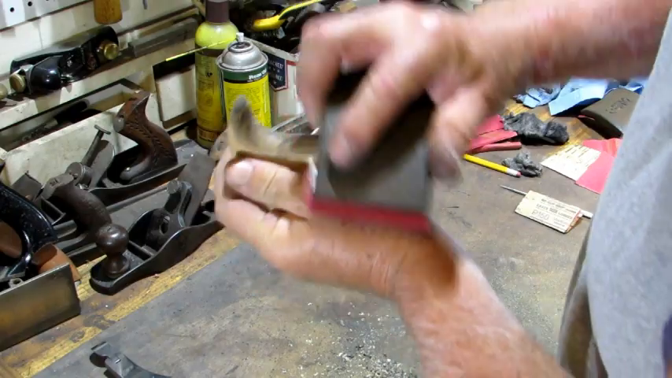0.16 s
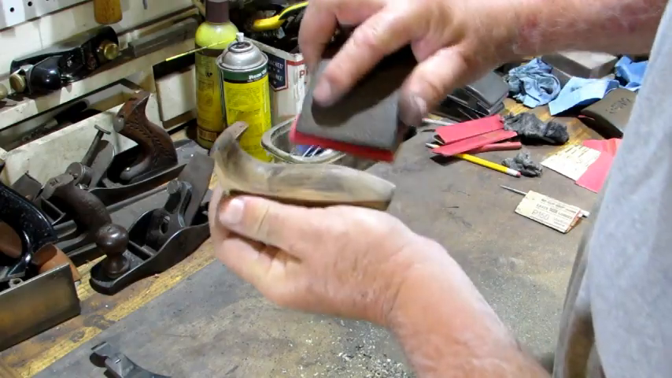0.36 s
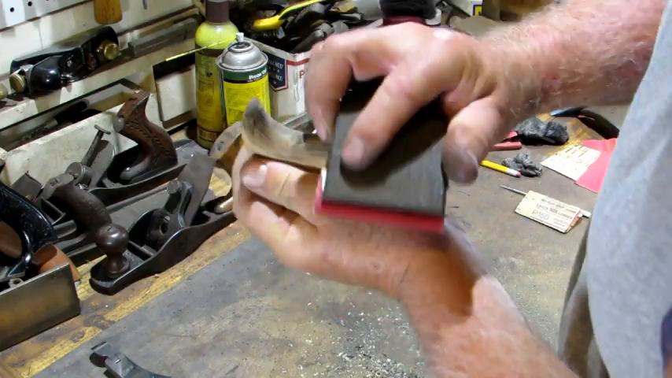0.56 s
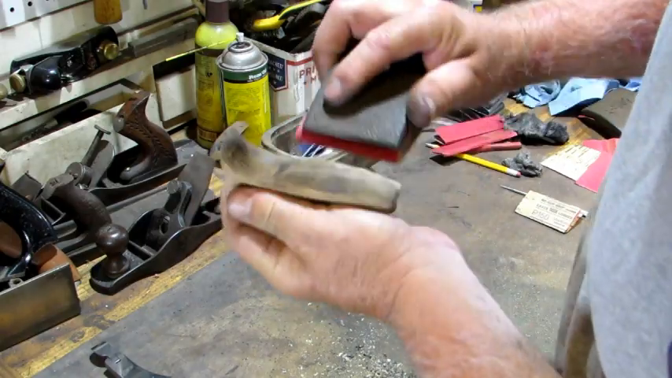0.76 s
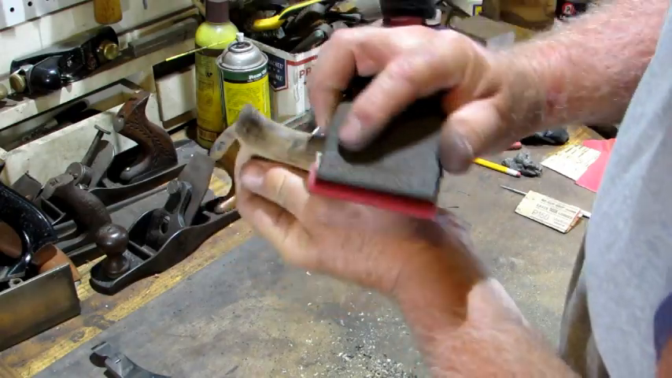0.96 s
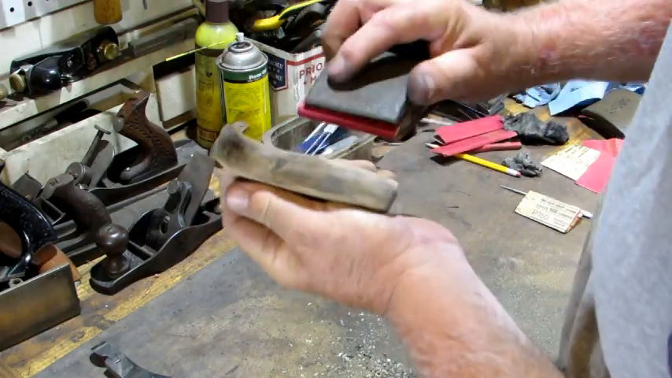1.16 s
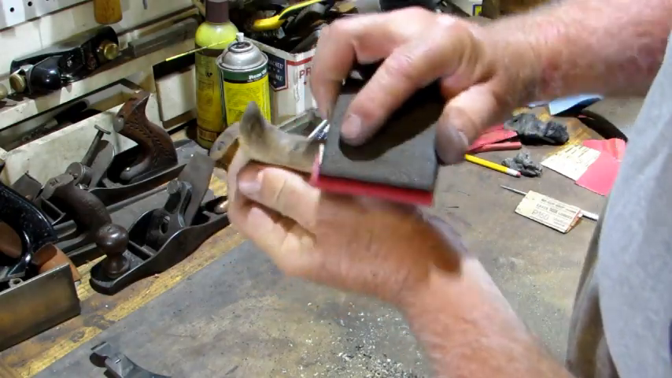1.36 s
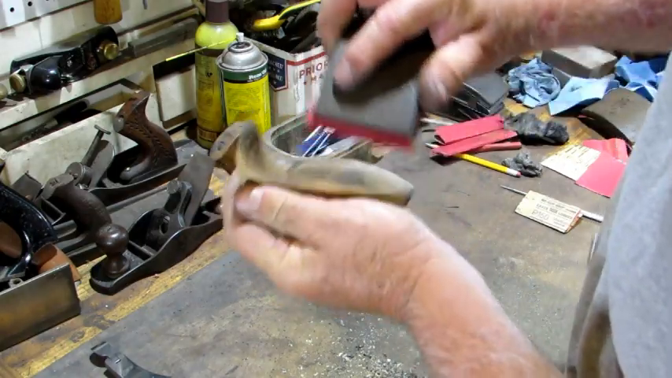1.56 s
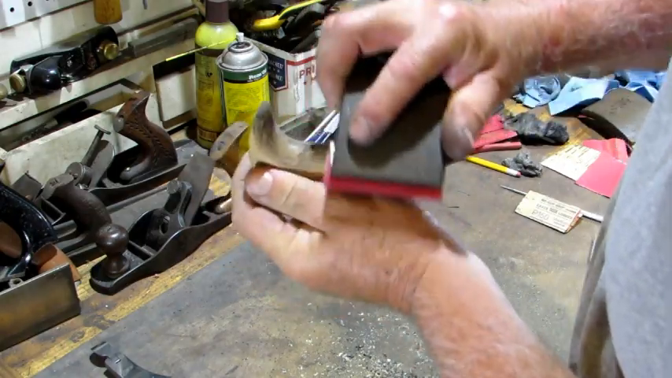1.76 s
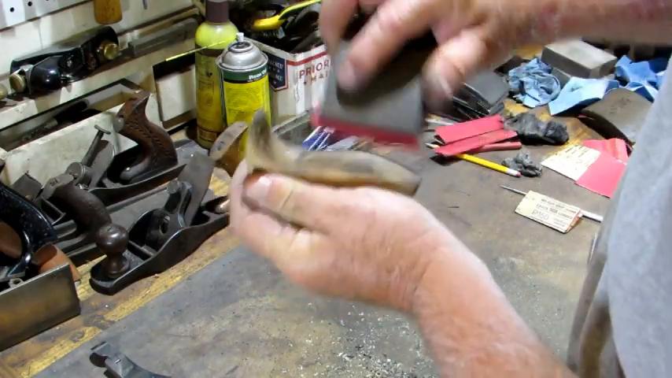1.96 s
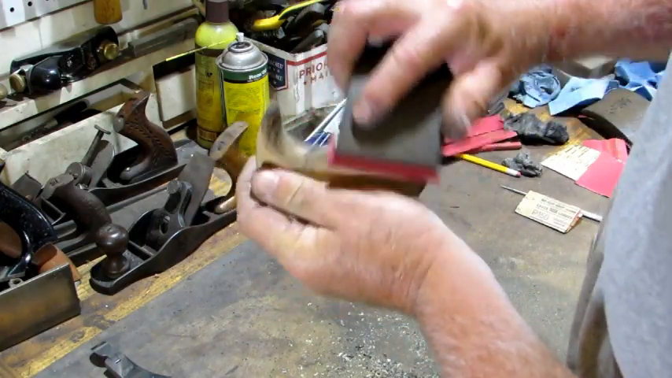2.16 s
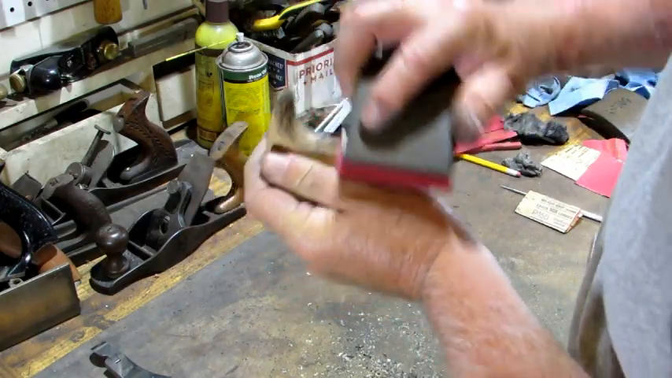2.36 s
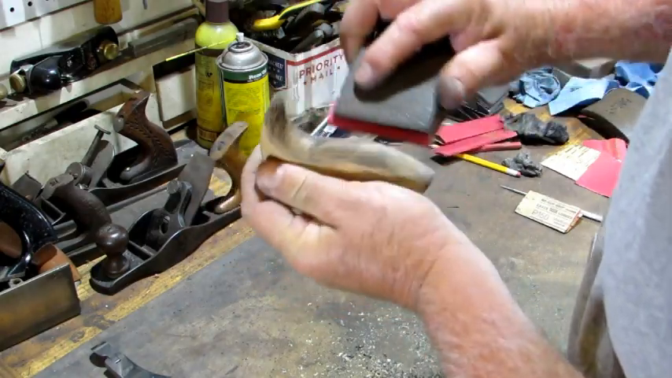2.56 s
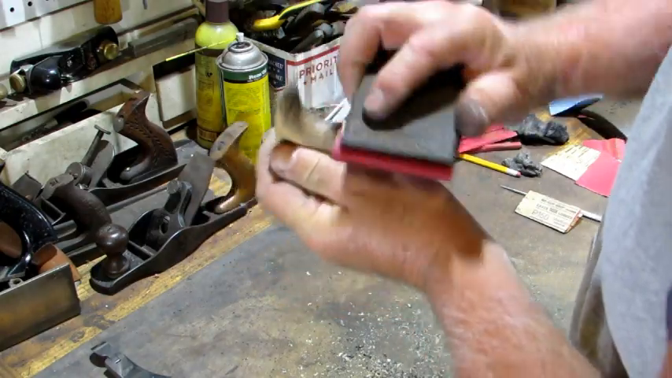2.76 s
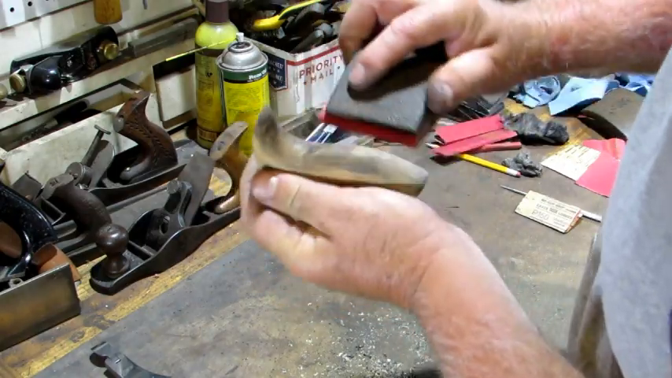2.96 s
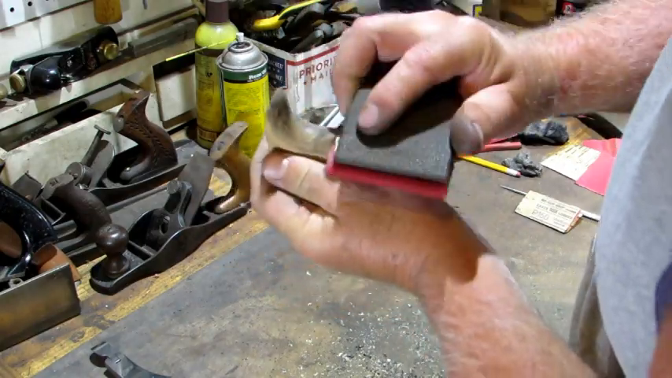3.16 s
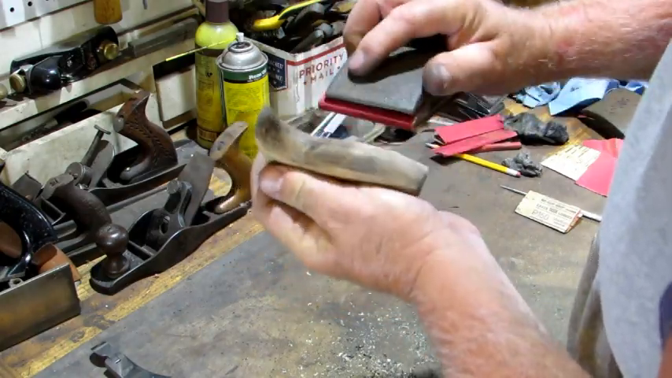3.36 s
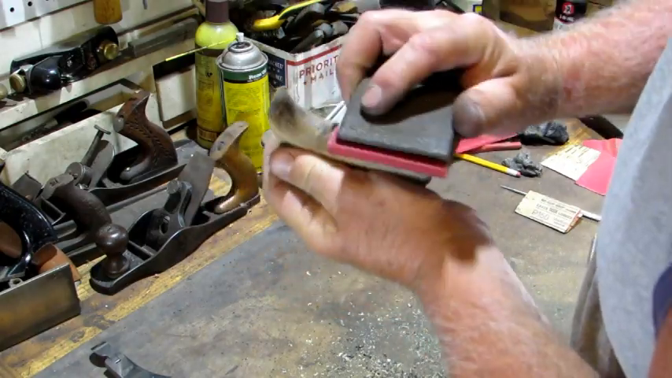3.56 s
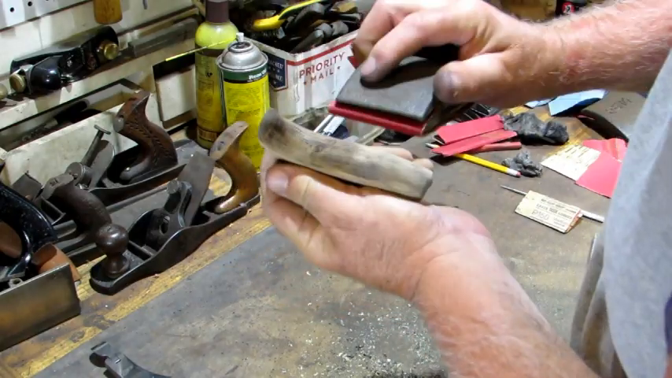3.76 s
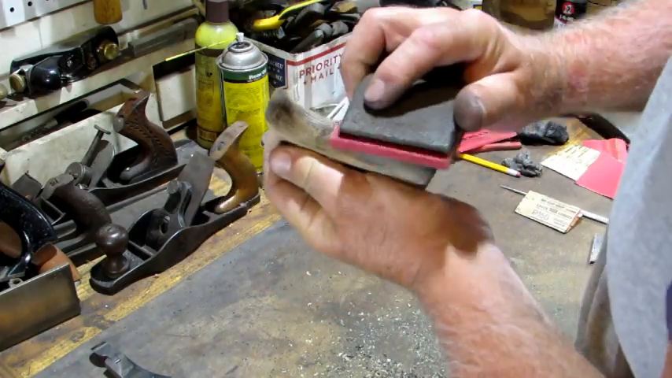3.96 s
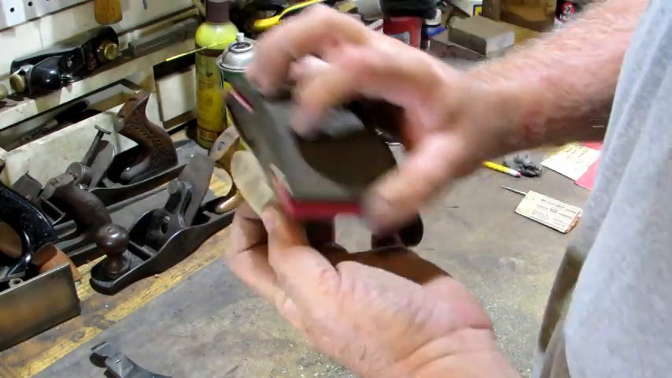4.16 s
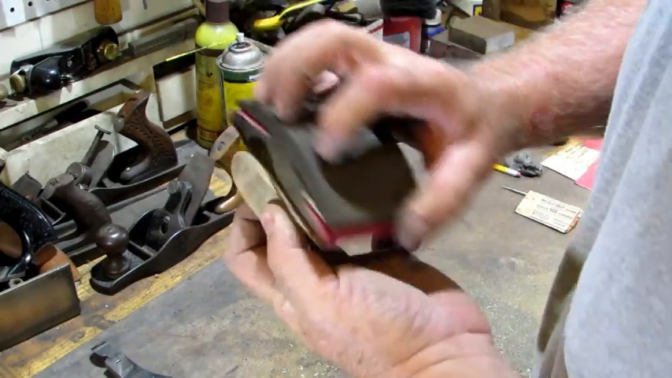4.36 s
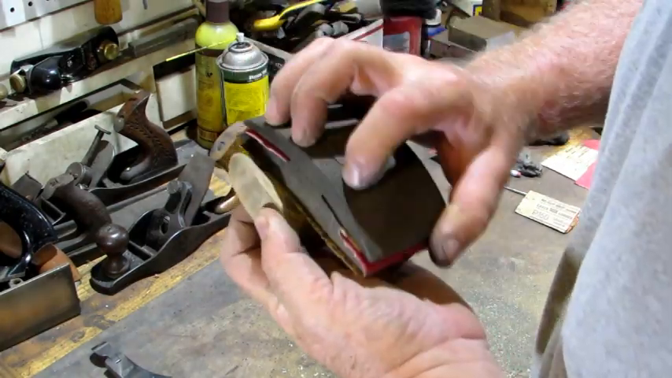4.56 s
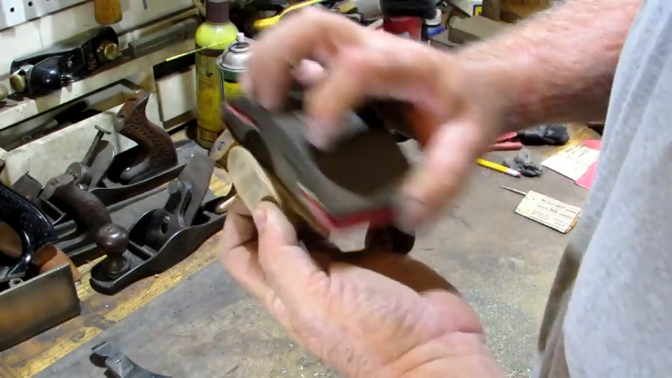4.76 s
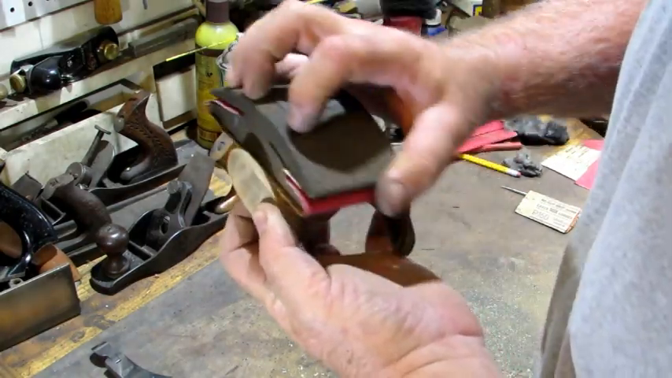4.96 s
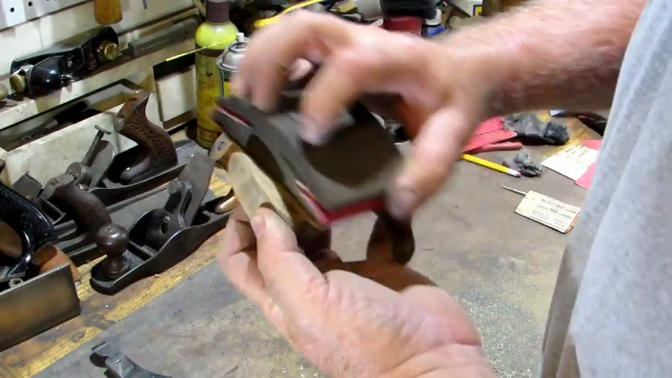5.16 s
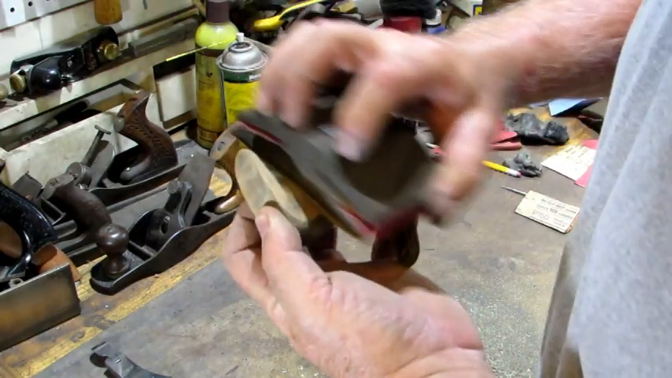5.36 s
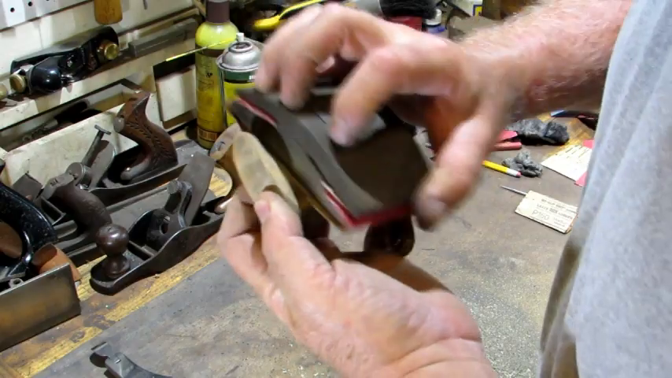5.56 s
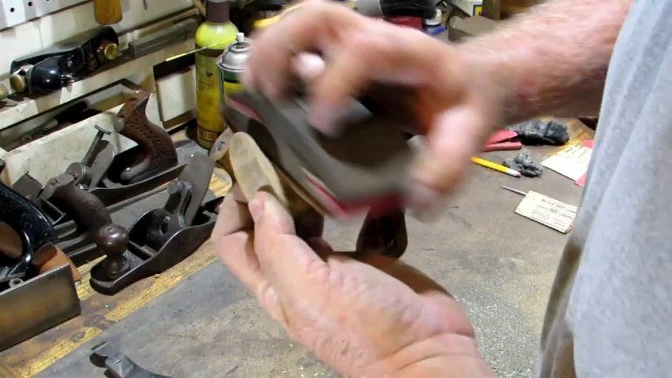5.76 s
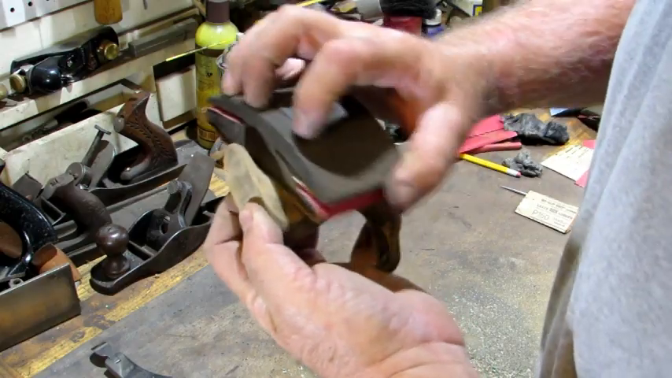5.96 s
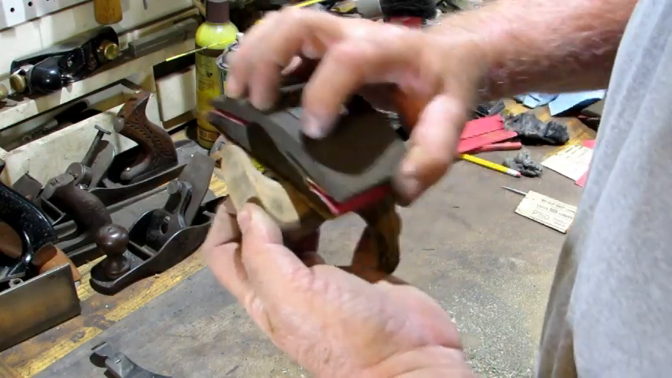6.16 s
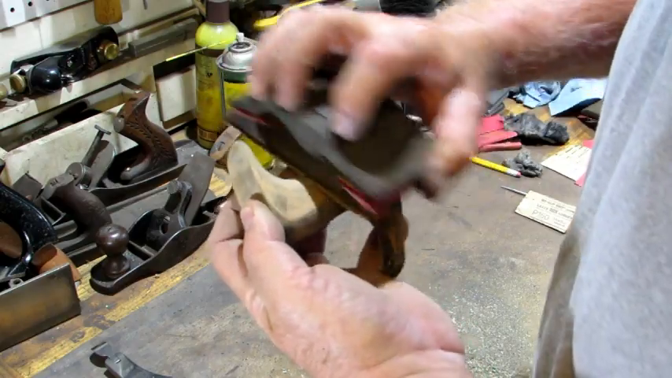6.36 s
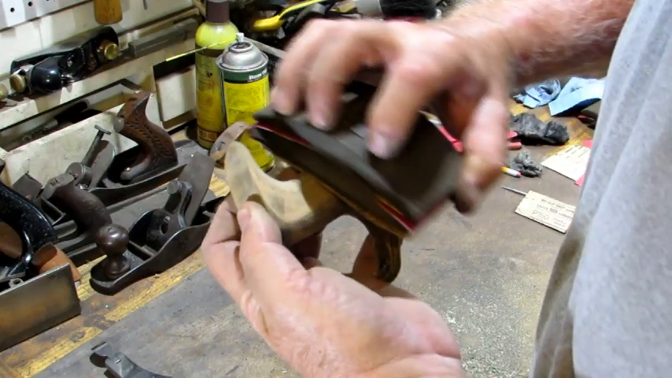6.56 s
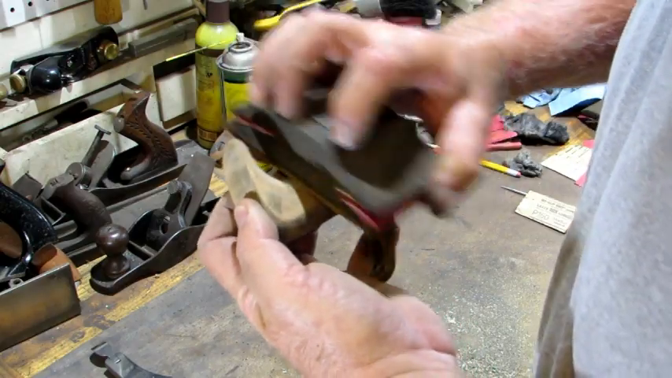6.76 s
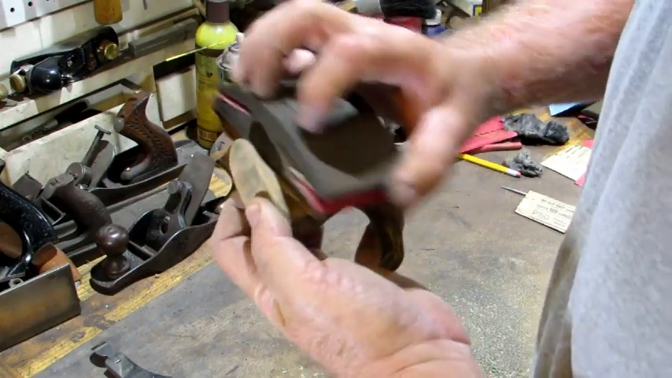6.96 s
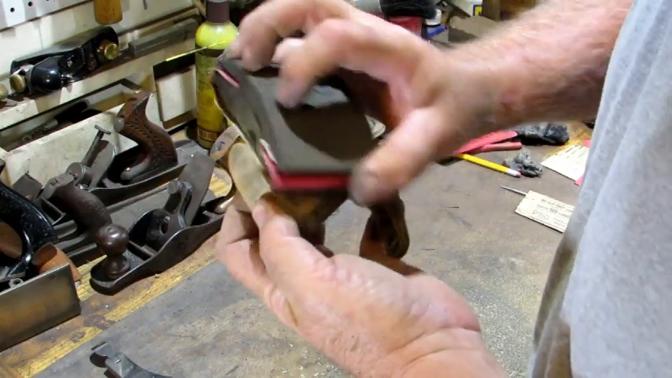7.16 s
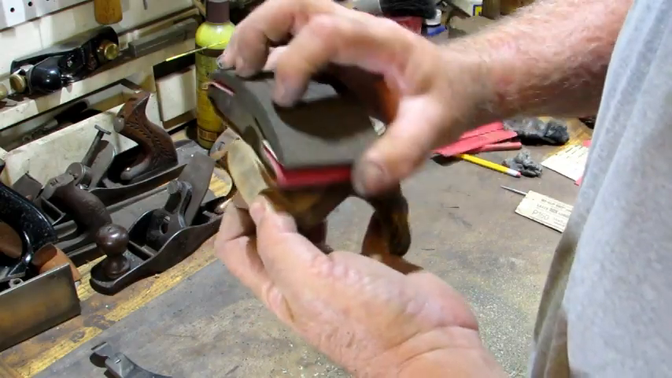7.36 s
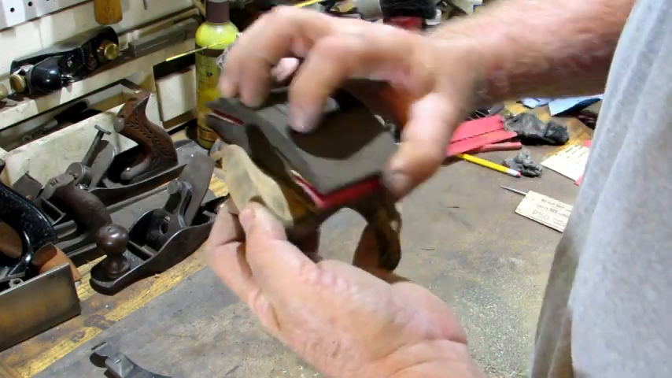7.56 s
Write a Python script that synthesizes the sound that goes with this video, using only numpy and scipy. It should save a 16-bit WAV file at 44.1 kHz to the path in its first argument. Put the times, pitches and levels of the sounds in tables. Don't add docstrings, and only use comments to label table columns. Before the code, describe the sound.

Close to the hands in a small workshop, a sandpaper block lands on a piece of hardwood with a knock, rasps away and back, then lifts, nearly three times a second. Halfway through, the scene cuts abruptly to quick continuous scrubbing, with hollow woody tones under bright grit hiss. A fan hums steadily behind, and the bench and walls answer briefly.

```python
import sys
import numpy as np
from scipy import signal
from scipy.fft import rfft, irfft, next_fast_len
from scipy.io import wavfile
from scipy.ndimage import uniform_filter1d, map_coordinates

SR = 44100
rng = np.random.default_rng(int(sys.argv[2]) if len(sys.argv) > 2 else 0)


def dump_mix(stems):
    frames = np.atleast_2d(stems).T
    limited = np.clip(frames, -1, 1)
    pcm = np.round(limited * 32767).astype(np.int16)
    wavfile.write(sys.argv[1], SR, pcm)


def gain_from_db(level_db):
    decades = np.asarray(level_db, float) / 20
    return 10 ** decades


N = 336483
LEAD = SR // 4
M = N + LEAD
CHANGE_S = 4.0293
CUT = LEAD + round(CHANGE_S * SR)

# [low body modes/dB, high body modes/dB, top upper modes/dB]
LEAN = [
    (0.5, -3.5, -5),
    (-2.5, 0, 5.5),
    (3.5, -2, -4),
    (3.5, -1.5, .3),
]


def unit(x):
    return x / np.sqrt(np.mean(x ** 2) + 1e-20)


def along(points, hz):
    f, v = np.transpose(points)
    return np.interp(np.log(hz + 1), np.log(f + 1), v)


def wobble(rate):
    step = np.arange(0, M + 32, 32)
    knots = rng.standard_normal(int(M * rate / SR) + 5)
    return np.interp(np.arange(M), step, map_coordinates(knots, [step * rate / SR]))


def filtered(x, response):
    m = next_fast_len(x.shape[-1] + 8192)
    return irfft(rfft(x, m) * response(np.fft.rfftfreq(m, 1 / SR)), m)[..., :x.shape[-1]]


def spread(pair, alike):
    turn = lambda hz: np.arccos(np.clip(along(alike, hz), -1, 1)) / 2
    mid, side = filtered(pair, lambda hz: np.array([np.cos(turn(hz)), np.sin(turn(hz))]))
    return np.array([mid + side, mid - side])


def add(track, start, part):
    stop = min(start + part.shape[-1], CUT if start < CUT else M)
    track[..., start:stop] += part[..., :stop - start]


def fan():
    # [f/Hz, level/dB per Hz]
    air_levels = [(20, -33), (45, -28), (100, -25), (135, -31.5), (190, -19.5), (220, -19), (250, -12),
                  (310, -14.5), (400, -17.5), (520, -19), (610, -22), (850, -17.5), (1500, -24.5),
                  (3500, -32), (12000, -60)]
    # [f/Hz, level/dB]
    hums = [(88, -63.5), (106, -57.5), (160, -63), (230, -46.5), (248, -43.5), (283, -47.5), (300, -46),
            (390, -51), (496, -49), (530, -47), (654, -49.5), (878, -51.5), (1099, -53.5)]
    # [f/Hz, likeness/0-1]
    air_alike = [(30, 0.17), (70, 0.033), (150, 0.16), (300, 0.91), (600, 0.54), (1200, 0.77), (4000, 0.82)]
    blade_hz, blade_db = 336.2, -35
    t = np.arange(M) / SR
    noise = filtered(rng.standard_normal((2, M)), lambda hz: gain_from_db(along(air_levels, hz)))
    air = gain_from_db(-34.5 + 0.47 * wobble(3.16)) * unit(noise)
    wander = 0.63 * np.cumsum(wobble(9)) / SR
    air[0] += gain_from_db(blade_db + 3 + 0.18 * wobble(21)) * np.sin(2 * np.pi * (blade_hz * t + wander))
    for hz, db in hums:
        wander = 2.8 * np.cumsum(wobble(9)) / SR
        swell_db = 2.5 * wobble(8)
        air[0] += gain_from_db(db + swell_db) * np.sin(2 * np.pi * (hz * t + wander))
    balance = gain_from_db([[-.6], [.6]])
    return (spread(air, air_alike) * balance)[:, LEAD:]


def shop(x, wet_db, bench_db, alike):
    # [f/Hz, t60/s]
    room_t60 = [(500, 0.68), (2500, 0.58), (6000, 0.57), (12000, 0.31)]
    out = x.copy()
    edges = np.r_[np.arange(CUT, 0, -SR // 4)[::-1], np.arange(CUT, M, SR // 4)[1:], M]
    for at, end in zip(np.r_[0, edges[:-1]], edges):
        noise = rng.standard_normal((3, int(.4 * SR)))
        hz, t, z = signal.stft(noise[:2] + alike * noise[2], SR, nperseg=256)
        room = gain_from_db(-60 * t / along(room_t60, hz)[:, None])
        bench = gain_from_db(bench_db - 60 * t / 0.023)
        tail = signal.istft(z * (room + bench), SR, nperseg=256)[1]
        wet = signal.fftconvolve(x[:, at:end], tail / np.linalg.norm(tail[0]), axes=1)
        add(out, at + 200, gain_from_db(wet_db) * wet)
    return out


def landings():
    # [t/s, peak level/dB, ring after the slap/dB]
    slaps = [(0.1504, -8, -6), (0.517, -19, 0), (0.894, -18, -1), (0.898, -24, -8), (1.245, -13.5, -5),
             (1.621, -31, -6), (1.994, -27, -3), (2.376, -20, -2), (2.746, -12, 4.5), (3.102, -18.5, 8.5),
             (3.457, -17, 1), (3.828, -28, 4)]
    # [f/Hz, level/dB, t60/s]
    knock_modes = [(490, -7, .035), (640, -13, .022), (800, -11, .035), (980, -15, .03), (1900, -16, .025),
                   (2710, -12, .06)]
    out, t = np.zeros(M), np.arange(SR // 8) / SR
    luck_db = 1.5 * rng.standard_normal((len(slaps), len(knock_modes)))
    after = t - .0013
    cycles = after * 1450
    slap = np.exp(-(2.3 * cycles) ** 2) * np.sin(2 * np.pi * cycles + 1)
    onset = 1 - np.exp(-t / 0.0017)
    for (s, db, ring_db), own_db in zip(slaps, luck_db):
        ring = np.zeros(len(t))
        for (hz, mode_db, t60), luck in zip(knock_modes, own_db):
            ring += gain_from_db(mode_db + luck - 60 * t / t60) * np.cos(2 * np.pi * hz * after)
        knock = slap + gain_from_db(np.minimum(ring_db, 7)) * ring * onset
        add(out, LEAD + round(s * SR), gain_from_db(db - 0.5) * knock)
    return signal.sosfilt(signal.butter(2, 300, "high", fs=SR, output="sos"), out)


def strokes():
    # [t/s, hiss peak/0-1, grit hiss level/dB, wood body level/dB, upper ring level/dB]
    slow_away = [(0.142, 0.13, -29, -28, -31), (0.505, 0.17, -29.5, -29.5, -31),
                 (0.886, .12, -28.5, -24.5, -27.5), (1.243, 0.06, -25.5, -23, -24.5),
                 (1.62, 0.1, -33, -25, -25), (1.989, 0.15, -28, -26.5, -26), (2.369, 0.07, -28, -27, -25.5),
                 (2.738, 0.05, -30.5, -25.5, -33), (3.096, .13, -30, -27.5, -31),
                 (3.45, 0.11, -28, -25, -28), (3.827, 0.09, -29.5, -23, -26.5)]
    # [t/s, length/s, grit hiss level/dB, wood body level/dB, upper ring level/dB]
    slow_back = [(-.12, .11, -33, -28, -30), (0.232, 0.14, -30, -25, -32.5), (0.6, 0.15, -30, -27, -31),
                 (0.976, 0.13, -29.5, -27.5, -34), (1.346, 0.13, -30, -29.5, -29),
                 (1.715, 0.13, -31.5, -29.5, -33.5), (2.092, 0.12, -28.5, -25.5, -32.5),
                 (2.462, 0.13, -28, -22.5, -33), (2.818, 0.14, -29, -26, -31.5),
                 (3.186, 0.13, -30, -29, -30.5), (3.542, 0.14, -28.5, -30, -37),
                 (3.936, 0.14, -25, -30.5, -32)]
    # [middle t/s, grit hiss level/dB, wood body level/dB, upper ring level/dB]
    fast_strokes = [(4.082, -32.5, -27.5, -33), (4.187, -34.0, -30.5, -31), (4.313, -31.5, -24, -36),
                    (4.432, -32.5, -31, -31.5), (4.553, -27.5, -22.9, -32.5), (4.675, -27, -27.5, -32),
                    (4.797, -27, -22.5, -29), (4.925, -28.3, -26.5, -25.5), (5.042, -29, -23, -28.5),
                    (5.171, -29.5, -27.5, -33), (5.294, -30.5, -22.3, -36), (5.429, -29.5, -26, -29),
                    (5.542, -33.5, -23.5, -37), (5.648, -29, -27.5, -29.2), (5.784, -28.5, -20, -26.5),
                    (5.906, -32.5, -28.5, -33), (6.036, -30.5, -21.5, -31), (6.161, -33, -28, -29),
                    (6.29, -31, -22, -30.5), (6.409, -31.5, -26.5, -32), (6.54, -31, -20, -29),
                    (6.667, -29, -27.5, -27.5), (6.777, -29.5, -24, -31.5), (6.89, -29, -27.5, -29.5),
                    (7.002, -31.5, -26.5, -29.5), (7.114, -31.1, -26.5, -28), (7.239, -33.3, -24.5, -29.4),
                    (7.339, -36, -28, -30), (7.459, -27.5, -20.5, -25.8), (7.587, -31.5, -30, -37)]
    peaks_at = [
        (0.83, .2),
        (0.4, .45),
        (0.55, 0.42),
    ]
    away_length_s, wood_later = 0.12, 1.6
    fast_length_s, fast_lead_s = (0.099, 0.1), (.046, 0.051)
    rows = []
    for s, peak, *levels in slow_away:
        rows.append((s, away_length_s, *levels, peak, wood_later * peak, 0))
    for row in slow_back:
        rows.append((*row, *peaks_at[0], 1))
    for k, (middle, *levels) in enumerate(fast_strokes):
        way = k % 2
        rows.append((middle - fast_lead_s[way], fast_length_s[way], *levels, *peaks_at[1 + way], 2 + way))
    *columns, kind = np.transpose(sorted(rows))
    return *columns, kind.astype(int)


def speed(length, peak, sharp):
    u, p = np.linspace(0, 1, int(length * SR)), np.clip(peak, .02, .97)
    return ((u / p) ** p * ((1 - u) / (1 - p)) ** (1 - p)) ** sharp


def scratch(spike_db, clump_db):
    rank = np.minimum(rng.exponential(size=M), 3.5)
    size = gain_from_db(spike_db * rank + clump_db * (wobble(40) + wobble(260)))
    return unit(size * rng.standard_normal((2, M)))


def patchy(x, depth_db):
    z = signal.stft(x, nperseg=512)[2]
    field = uniform_filter1d(rng.standard_normal(z.shape[1:]), size=5, axis=0)
    field = uniform_filter1d(field, size=5, axis=1)
    return signal.istft(z * gain_from_db(depth_db * unit(field)), nperseg=512)[1][:, :M]


def ringing(modes, passes, lean_db, climb, scatter_db):
    table = np.array(modes)
    drive = np.zeros((len(table), M))
    luck = rng.standard_normal((len(passes), len(table)))
    octave = np.log2(table[:, 0] / np.median(table[:, 0]))
    for k, (s, length, db, peak, sharp) in enumerate(passes):
        grip = (k + 1) % 2 + 2 * (s > CHANGE_S)
        share = gain_from_db(table[:, 2 + grip] + scatter_db * luck[k] + lean_db[k])
        shape = np.array([speed(length, peak + climb[grip] * o, sharp) for o in octave])
        add(drive, LEAD + round(s * SR), gain_from_db(db) * share[:, None] / np.linalg.norm(share) * shape)
    ticks, out = scratch(spike_db=2.5, clump_db=1.0), 0
    for (hz, width_hz, *_), push in zip(modes, drive):
        drift = gain_from_db(2.6 * wobble(35))
        width_hz = max(width_hz, 110)
        b, a = signal.iirpeak(hz, hz / width_hz, SR)
        out = out + signal.lfilter(b, a, ticks * push * drift) / np.sqrt(np.pi * width_hz / SR)
    return out


def grit_hiss(s, length, level_db, peak):
    # [f/Hz, level/dB per Hz]
    hiss_levels = [(300, -46), (900, -37), (1500, -10), (3000, -4), (6000, 2), (9000, 1), (12500, 3.5),
                   (14000, -4), (15200, -22)]
    push = np.zeros(M)
    for start, span, db, p in zip(s, length, level_db, peak):
        add(push, LEAD + round(start * SR), gain_from_db(db) * speed(span, p, sharp=2.0))
    grit = patchy(scratch(spike_db=2.5, clump_db=1.33), depth_db=2.5)
    return gain_from_db(3.5) * push * unit(filtered(grit, lambda hz: gain_from_db(along(hiss_levels, hz))))


def wood_body(s, length, level_db, peak, kind, low_db, high_db):
    # [f/Hz, width/Hz, slow away/dB, slow back/dB, fast away/dB, fast back/dB]
    body_modes = [(1780, 350, -41, -56, -82, -58), (1920, 174, -4.5, 7, -2.5, -4),
                  (2185, 113, -8.5, -6, 5, -5), (2477, 187, -3.5, 6.5, 6, 3), (2720, 56, 2, -6, 12.5, 0),
                  (2932, 83, -3, 0, 8, 6), (3200, 200, -3, 6.5, 5, 8), (3490, 190, -22, 4.5, -6, 1.5)]
    bite_s = [
        0.0046,
        0.021,
        0.0014,
        0.0019,
    ]
    swell_sharp = [
        1.6,
        1.22,
        1.46,
        0.95,
    ]
    hz = np.array(body_modes)[:, 0]
    lean_db = np.outer(low_db, hz < 2300) + np.outer(high_db, hz > 3050)
    bite = np.take(bite_s, kind)
    passes = np.transpose([s + bite, length - bite, level_db - 2.5, peak, np.take(swell_sharp, kind)])
    return ringing(body_modes, passes, lean_db, climb=[0.11, 0.0097, 0.24, 0.26], scatter_db=0.85)


def upper_ring(s, length, level_db, peak, top_db):
    # [f/Hz, width/Hz, slow away/dB, slow back/dB, fast away/dB, fast back/dB]
    upper_modes = [(4700, 190, 0.5, -10, 1, -9), (5130, 270, -1.5, -2, 6, 5),
                   (5640, 460, -5, 6.5, -16, 0.5), (6560, 720, 6, 3, 4, -2), (7200, 100, 5.5, 0, 2, -0.5)]
    lean_db = np.outer(top_db, np.array(upper_modes)[:, 0] > 6100)
    passes = np.transpose([s, length, level_db - 1.5, peak, np.full(len(s), 2.6)])
    return ringing(upper_modes, passes, lean_db, climb=[-0.18, 0.85, 0.37, -0.16], scatter_db=0.8)


def sanding():
    # [f/Hz, likeness/0-1]
    rub_alike = [(1000, 1), (3000, 0.94), (6000, 0.84), (9000, 0.66), (13000, 0.42)]
    s, length, hiss_db, body_db, upper_db, hiss_peak, wood_peak, kind = strokes()
    shift_db = rng.standard_normal((len(s), 3))
    low_db, high_db, top_db = (np.array(LEAN)[kind] + shift_db).T
    hiss = grit_hiss(s, length, hiss_db, hiss_peak)
    body = wood_body(s, length, body_db, wood_peak, kind, low_db, high_db)
    upper = upper_ring(s, length, upper_db, (wood_peak + hiss_peak) / 2, top_db)
    return spread(hiss + body + upper, rub_alike)


def scene():
    work = shop(sanding() + landings(), wet_db=-6.5, bench_db=-2.5, alike=0.99)
    return work[:, LEAD:] + fan()


def top_cut(x):
    return signal.sosfilt(signal.butter(12, 15650, fs=SR, output="sos"), x)


def record(dry):
    # [f/Hz, half width/Hz, depth/0-1]
    gaps = [(3950, 150, .7), (7850, 45, .88)]
    notches = lambda hz: np.prod([1 - depth * np.exp(-((hz - c) / w) ** 2) for c, w, depth in gaps], axis=0)
    top = lambda hz: gain_from_db(-45 * np.clip((hz - 14950) / 700, 0, 1))
    mix = filtered(dry, lambda hz: notches(hz) * top(hz))
    return top_cut(mix)


dry = scene()
out = record(dry)
dump_mix(out)
```